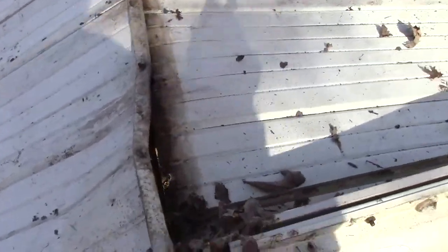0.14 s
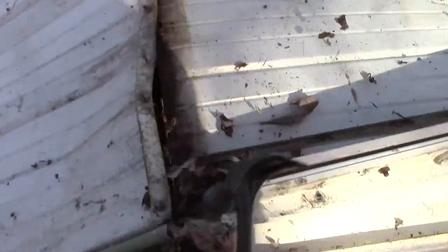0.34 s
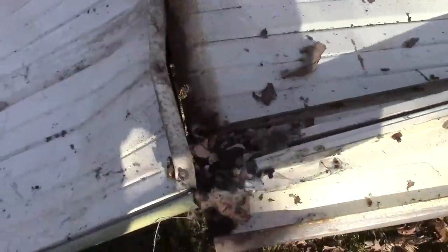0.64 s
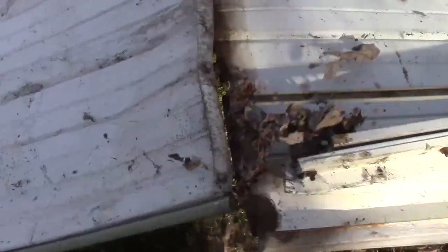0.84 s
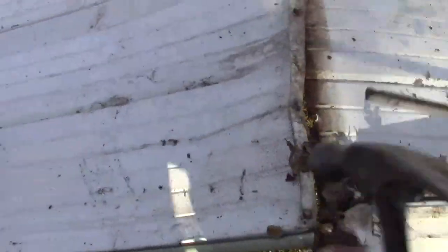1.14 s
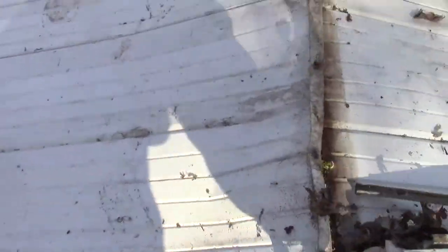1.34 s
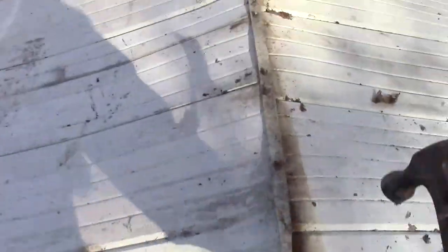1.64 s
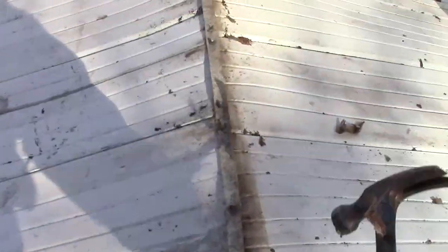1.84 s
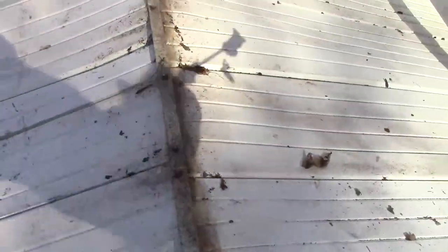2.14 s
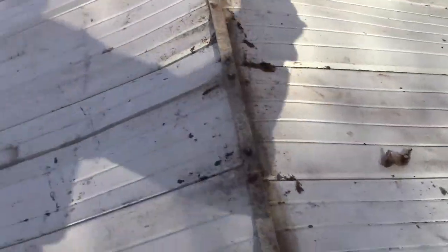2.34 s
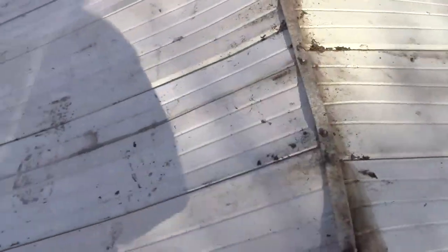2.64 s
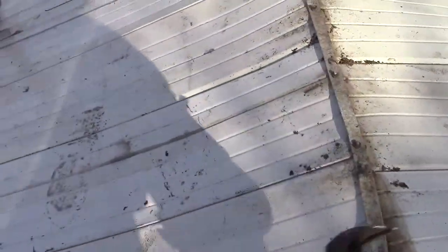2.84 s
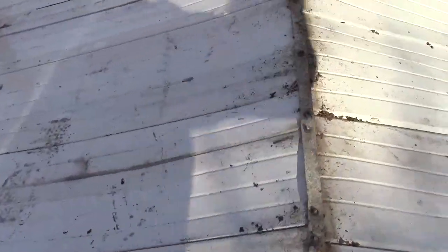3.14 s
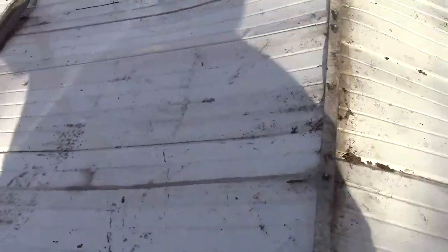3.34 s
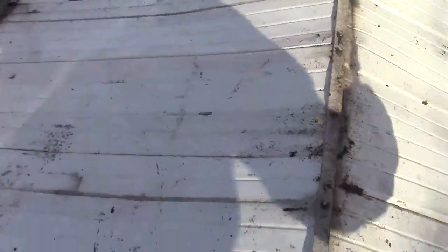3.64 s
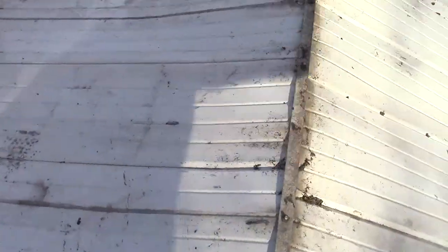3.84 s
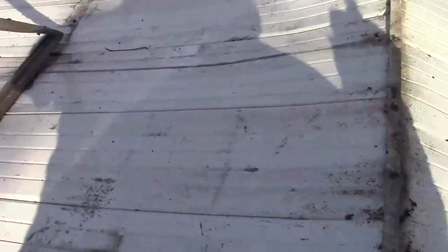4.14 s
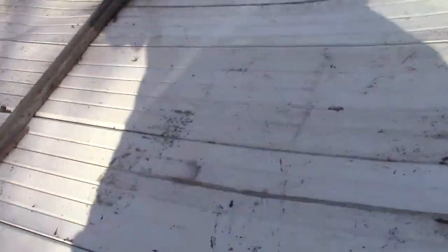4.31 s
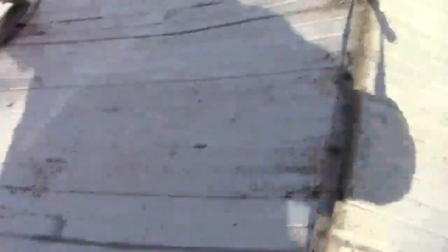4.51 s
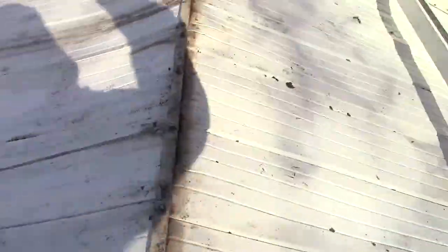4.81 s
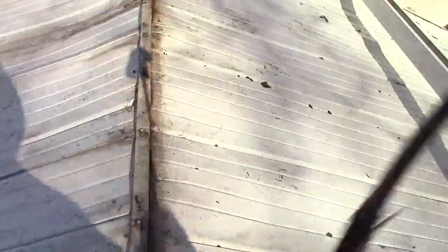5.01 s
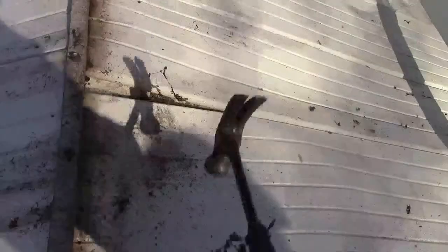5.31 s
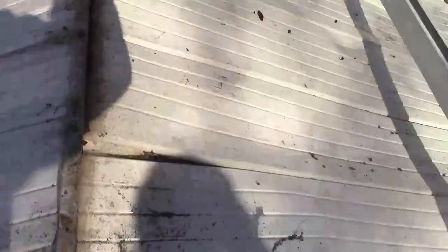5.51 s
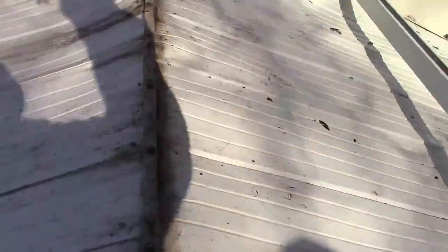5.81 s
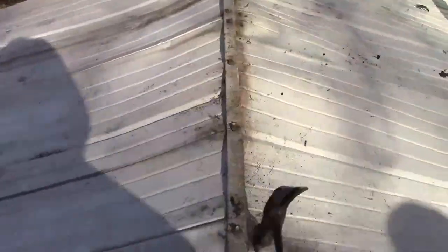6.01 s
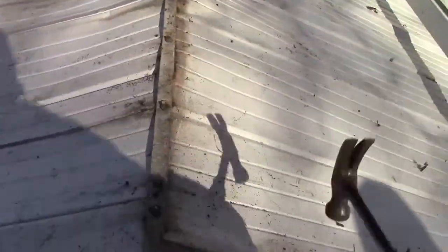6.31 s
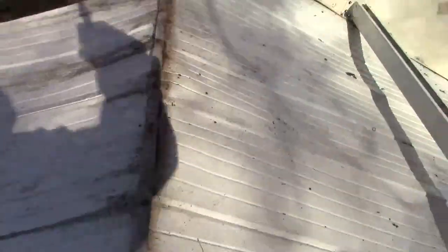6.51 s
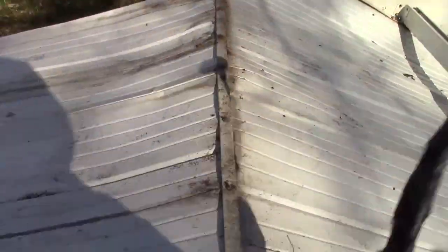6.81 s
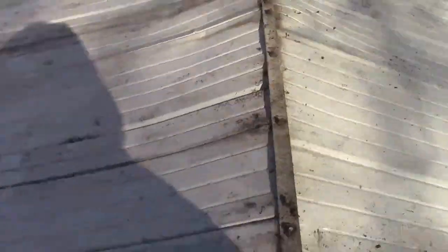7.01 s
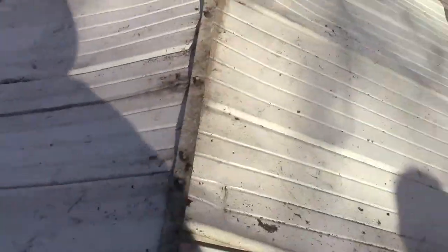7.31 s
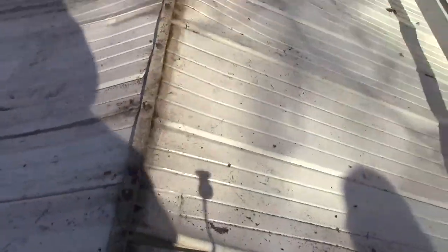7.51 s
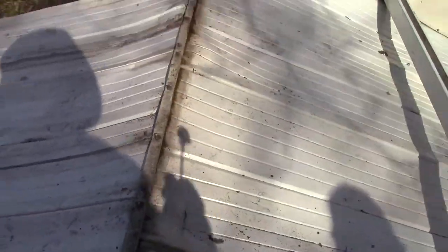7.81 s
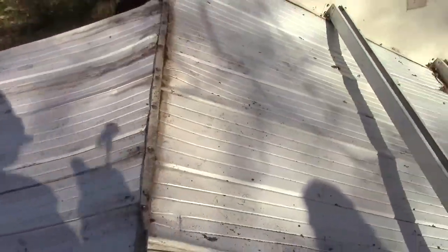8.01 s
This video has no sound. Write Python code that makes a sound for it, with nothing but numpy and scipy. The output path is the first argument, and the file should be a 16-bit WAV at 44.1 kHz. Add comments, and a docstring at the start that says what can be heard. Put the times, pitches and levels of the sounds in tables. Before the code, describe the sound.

A hammer strikes the thin ribbed steel wall of a collapsed shed eight times, a little under a second apart, close to the microphone outdoors. Each blow is a sharp, briefly ringing crash, and most are followed by a softer slap of the loose panel. The sheet grumbles and hums while grit and dry leaves skitter over it. Light taps end the sequence, and a distant bird whistles very faintly twice.

```python
"""A claw hammer strikes the seam of a collapsed shed's thin ribbed steel wall, on grass an arm's length away.
Each impact excites the sheet's densely spaced modes as a crash; the loose panel often slaps back, and
the seam sometimes buzzes. Stored vibration decays slowly, so the wall grumbles and hums while grit and
dry leaves skitter on it. The worker shifts about a few times, and a small bird whistles twice far off."""
import sys
import numpy as np
from scipy import signal
from scipy.fft import rfft, irfft, next_fast_len
from scipy.io import wavfile

SR = 44100
rng = np.random.default_rng(int(sys.argv[2]) if len(sys.argv) > 2 else 0)


def wav_record(signal):
    """Record a signal, one row per channel, as 16-bit PCM in the file named by sys.argv[1]."""
    frames = np.transpose(np.atleast_2d(signal))
    bounded = np.clip(frames, -1, 1)
    # unit amplitude maps onto the largest positive 16-bit level
    quanta = np.round(bounded * 32767).astype(np.int16)
    wavfile.write(sys.argv[1], SR, quanta)


N = 359415

# hammer blows: (time [s], relative level [dB], thump [dB], body [dB], treble [dB],
# ring time [ratio], boom [Hz], zing [Hz])
BLOWS = [(0.2772, -13, -5.5, -8, -2, 0.95, 770, 9050), (0.868, -14.5, -6, -11.5, 1, 0.77, 1190, 7100),
         (2.5262, -13.5, 3.5, -7.5, 1, 0.95, 450, 6200), (3.4138, -14.5, 4.5, 0.5, -2, 0.95, 340, 6000),
         (4.2816, -13, 6, -1.6, 0, 0.88, 650, 6520), (5.1216, -12, 3, -0.5, 0, 0.94, 510, 6780),
         (6.0406, -13.5, 5.5, 0.5, 1, 0.94, 530, 7780), (6.9228, -13, 4, 1.5, 1.5, 0.97, 540, 7180)]
# the loose panel slapping back: (the columns of BLOWS, edge clank level [dB])
SLAPS = [(0.5401, -28, -9.5, -10.5, -1, 1.12, 805, 3415, -11.5),
         (1.309, -32, -4.5, -8, -0.5, 1.48, 350, 6200, -36), (2.355, -41, 1, -4, -1.5, 1.4, 523, 4490, -36),
         (3.0709, -27.5, 2, -4.5, 0.5, 1.32, 433, 6000, -15.5),
         (3.8135, -23.5, 0, -4, 1.5, 1.14, 444, 5800, -24),
         (4.5648, -25, 1, -1.5, 1.2, 1.28, 547, 6500, -17),
         (5.3432, -26.5, 2.5, -4, 0.2, 0.85, 500, 6460, -18.5)]
# where a struck spot's thump, body, two level mids and treble lie: (frequency [Hz])
SPOT_TONE_HZ = [200, 500, 1100, 2500, 7000]
# excitation by a hard blow and by a soft slap: (frequency [Hz], spectral level [dB])
BLOW_SPECTRUM = [(18, -63), (30, -36), (65, -25), (135, -6), (259, 0.5), (540, -0.5), (822, -1.5),
                 (962, -0.5), (1250, -3.5), (1720, -1.5), (2410, -3), (2980, -2.5), (4530, -8),
                 (6050, -8.5), (8080, -8.5), (13700, -22.5), (16000, -47)]
SLAP_SPECTRUM = [(18, -71.5), (30, -42), (103, -23), (259, -0.5), (600, 0), (801, -3), (866, -2.5),
                 (1350, -9), (1910, -7.5), (2230, -10), (5900, -17.5), (14000, -36), (16000, -47)]
# mode clusters between the ribs: (frequency [Hz], width [Hz], boost [dB])
RIB_MODES = [(520, 70, 0.5), (612, 220, 4), (1120, 260, -2.5), (1193, 25, 0.5), (1486, 55, 3.5),
             (1670, 38, 3), (1820, 110, 1.5), (1980, 100, 3), (2280, 40, 1.5), (2856, 19, 4),
             (3400, 110, 2), (3974, 33, 1.5), (5950, 140, 4), (6860, 120, 4), (7440, 40, 2)]
# damping of the sheet: (frequency [Hz], base early T60 [s], base late T60 [s], late share [dB])
DAMPING = [(50, 0.14, 0.16, -17.5), (136, 0.055, 0.8, -21.5), (248, 0.073, 0.66, -9), (730, 0.4, 0.63, -4),
           (1980, 0.37, 0.59, -12.5), (3960, .27, 0.69, -19), (6700, 0.18, 0.62, -21),
           (14000, 0.12, 0.13, -5)]
# the panel's strong modes where it is hit: (mean frequency [Hz], relative level [dB], T60 [s])
CLONK_MODES = [(320, -7, .14), (386, 0, .21), (450, -1, .2), (535, -2, .15), (635, -3, .14),
               (1590, -4, .022), (1830, -2, .03)]
# seam buzz after hits near the loose end: (start [s], duration [s], level [dB])
RATTLES = [(0.324, 0.14, -37), (0.865, 0.11, -22.5), (2.538, 0.099, -27)]
# tool, twigs and grit knocking on the sheet: (time [s], relative level [dB], centre [Hz], T60 [s],
# skirt steepness [dB], hollow knock share [dB])
TAPS = [(1.2725, -34, 1860, 0.21, 3, -12), (1.6635, -45, 2180, 0.24, 2.5, -10),
        (1.94, -44, 8000, 0.06, 1, -20), (2.028, -43.5, 990, 0.22, 3.5, -8),
        (3.653, -44, 6000, .12, 7, -20), (3.679, -44, 6060, 0.14, 8, -20), (4.081, -45, 6700, 0.15, 6, -20),
        (5.682, -50, 6360, 0.1, 7, -20), (6.441, -45, 6820, 0.06, 3, -20),
        (7.193, -38.5, 4800, 0.16, 4, -6), (7.265, -45, 5400, 0.2, 6, -6), (7.315, -41, 448, 0.3, 4.5, -6),
        (7.525, -50, 2000, 0.14, 4, -12), (6.8655, -31, 4140, 0.06, 4.5, -17),
        (7.6445, -28.5, 1450, 0.055, 6, -17), (7.715, -56.5, 1800, 0.8, 45, -10),
        (7.806, -46, 2000, 0.07, 4, 0), (7.858, -47, 1880, 0.14, 50, -20)]
# larger bits landing: (time [s], level [dB])
PEBBLES = [(3.196, -46), (4.052, -51), (4.474, -43), (4.619, -32), (5.7454, -56.5), (6.3506, -46.5),
           (7.346, -44)]
# the flexing sheet: (frequency [Hz], spectral level [dB])
GRUMBLE_SPECTRUM = [(40, -33), (85, -26), (135, -7), (230, -0.5), (600, -4), (1200, -10.5), (1900, -10),
                    (3000, -17), (6000, -41.5), (16000, -50.5)]
# lightly damped modes: (frequency [Hz], relative level [dB], nominal width [Hz])
HUM_MODES = [(690, -5, 14), (824, -2, 7), (1710, -8, 50), (1846, -6, 18)]
# sliding cloth and leaves: (frequency [Hz], spectral level [dB])
RUSTLE_SPECTRUM = [(200, -23.5), (1000, -1.5), (2000, 2.5), (4000, 3), (7000, 0), (10000, -3.5),
                   (15000, -13)]
# the worker's movements: (start [s], duration [s], grumble level [dB], rustle level [dB])
WORKER_SHIFTS = [(0.761, 0.16, -67, -61.5), (1.376, 0.54, -83, -63.5), (1.76, 0.49, -61, -60.5),
                 (2.119, 0.49, -65.5, -80.5), (6.64, 0.19, -60, -67), (7.643, 0.4, -71, -74)]
# the bird's notes: (start [s], duration [s], pitch [Hz], level [dB])
BIRD_NOTES = [(2.05, 0.19, 4550, -61.5), (2.15, 0.038, 7600, -61), (6.71, 0.17, 4640, -69),
              (6.746, 0.08, 7620, -73)]
# stereo width: (frequency [Hz], side relative to mid [dB])
SIDE_SPECTRUM = [(100, -40), (250, -46), (500, -46), (1000, -20), (2000, -21), (4000, -11.5),
                 (8000, -11), (14000, -13.5)]

BAND_EDGES_HZ = np.append([0, 85], 160 * 2 ** np.arange(0, 7.5, .5))
RING_S, EARLY_S = 1.0, .08  # a whole hit, and its opening
BOOM_DB, ZING_DB, SPOT_WIDTH = 3.5, 2, .12  # a struck spot's two peaks; width as a share of pitch
SHAKE_SPREAD_S, SHAKE_T60_S, DEBRIS_T60_S = .096, 1.44, .9
SLAP_SHAKE_DB = 7.5  # a falling panel shakes the wall more than the hammer does
GRIT_PER_S, GRIT_RANGE_DB = 110, 15


def impacts(table, spectrum, gain_db, clonk_db, rise_s, chatter_db, crack_db):
    """Impact excitation: the point where hammer or panel strikes sets the weight of the sheet's modes."""
    out = np.zeros(N)
    for s, db, thump_db, body_db, treble_db, ring, boom_hz, zing_hz, *_ in table:
        spot = list(zip(SPOT_TONE_HZ, [thump_db, body_db, 0, 0, treble_db]))
        boom = (boom_hz, SPOT_WIDTH * boom_hz, BOOM_DB)
        zing = (zing_hz, SPOT_WIDTH * zing_hz, ZING_DB)
        peaks = [*RIB_MODES, boom, zing]
        add(out, s, undb(db + gain_db) * crash(spectrum, spot, peaks, ring, rise_s, chatter_db, crack_db))
        add(out, s + .0012, undb(db + clonk_db) * clonk(spot))  # the panel bottoms out
    return out


def crash(spectrum, spot, peaks, ring, rise_s, chatter_db, crack_db):
    """Modal overlap: crowded modes merge into noise, each band decaying fast and then lingering."""
    size = int(RING_S * SR)
    t, hz = np.arange(size) / SR, bins(size)
    peaks_db = sum(db / (1 + (2 * (hz - f) / width) ** 2) for f, width, db in peaks)
    gain = undb(along(hz, spectrum) + along(hz, spot) + peaks_db)
    modes = gain * rfft(rng.standard_normal(size))
    # chattering edges and grit roughen the treble of the tail
    chatter = undb(chatter_db * (walk(600, size) + .8 * walk(45, size)))
    chatter /= rms(chatter)
    out = np.zeros(size)
    for lo, hi in zip(BAND_EDGES_HZ, BAND_EDGES_HZ[1:]):
        band, centre = (hz >= lo) & (hz < hi), (lo + hi) / 2
        early_t60, late_t60, late_db = (along(centre, DAMPING, column) for column in (1, 2, 3))
        # the contact itself, brightest at the top
        crack = undb(crack_db) * (1 + (centre / 7000) ** 2) * fade(t, t60=.012)
        early = fade(t, ring * early_t60) + crack
        late = undb(late_db) * fade(t, ring * late_t60) * (chatter if centre > 2500 else 1)
        # dispersion: bending waves are slower in the bass, so the lows swell later
        swell = 1 - np.exp(-t / (rise_s + .09 / centre))
        part = irfft(modes * band, size) * swell * np.hypot(early, late)
        out += part / rms(part) * rms(gain * band)
    return out / rms(out[:int(EARLY_S * SR)])


def clonk(spot):
    """Free vibration: a few strong modes ring as damped sines, varying in pitch and level by hit."""
    t = np.arange(int(RING_S * SR)) / SR
    out = np.zeros(len(t))
    for hz, db, t60 in CLONK_MODES:
        share, detune = rng.standard_normal(2)
        gain = undb(db + along(hz, spot) + .6 * share)
        out += gain * np.sin(2 * np.pi * hz * (1 + .065 * detune) * t) * fade(t, t60)
    return out * (1 - np.exp(-t / .0019))


def edge_clanks(pitch_hz, t60):
    """Heavily damped oscillation: the falling panel's edge meets the seam and rings very briefly."""
    out, t = np.zeros(N), np.arange(int(EARLY_S * SR)) / SR
    ping = np.sin(2 * np.pi * pitch_hz * t) * fade(t, t60) * (1 - np.exp(-t / .0005))
    for s, *_, clank_db in SLAPS:
        add(out, s + .001, undb(clank_db) * ping / ping.max())
    return out


def seam_rattles(centre_hz, skirt_db, rough_db):
    """Intermittent contact: overlapping edges buzz against each other in rough, bright bursts."""
    envelope = np.zeros(N)
    buzz = noise(hump(bins(N), centre_hz, skirt_db), N) * undb(rough_db * walk(400, N))
    for s, length, db in RATTLES:
        add(envelope, s, undb(db) * arch(length))
    return envelope * buzz / rms(buzz)


def taps(gain_db, rise_s, knock_hz, knock_t60):
    """Selective excitation: a light tap wakes one band of modes, over the panel's hollow knock."""
    out, size = np.zeros(N), SR // 2
    t, hz = np.arange(size) / SR, bins(size)
    for s, db, centre, t60, skirt_db, knock_db in TAPS:
        tap = noise(hump(hz, centre, skirt_db), size) * fade(t, t60)
        knock = undb(knock_db) * noise(hump(hz, knock_hz, skirt_db=6.5), size) * fade(t, knock_t60)
        add(out, s, undb(db + gain_db) * (tap + knock) * (1 - np.exp(-t / rise_s)))
    return out


def pebbles(centre_hz, skirt_db):
    """Isolated impulses: larger bits of grit and twig land one by one."""
    out = np.zeros(N)
    for s, db in PEBBLES:
        add(out, s, undb(db) * tick(centre_hz, skirt_db))
    return out


def tick(centre_hz, skirt_db):
    """Brief contact has a broad spectrum: a crumb on steel gives a snap and a faint ring."""
    size = int(EARLY_S * SR)
    t = np.arange(size) / SR
    snap, ring = fade(t, t60=.012), undb(-6) * fade(t, t60=.04)
    return noise(hump(bins(size), centre_hz, skirt_db), size) * (snap + ring)


def settling():
    """Incoherent sources add in power: the wall's shaking and the worker drive the quiet sounds."""
    shake, bounce = shaking(SHAKE_T60_S), shaking(DEBRIS_T60_S)
    weight, drag = worker(rest_grumble_db=-69, rest_rustle_db=-71.5)
    initial_sway = undb(-28.5) * fade(np.arange(N) / SR, SHAKE_T60_S)
    sway = np.hypot(shake, initial_sway)
    wall = grumble(np.hypot(undb(-25) * sway, weight), flex_db=.5) + hum(undb(-34) * sway)
    leaves = rustle(np.hypot(undb(-22.5) * bounce, drag), crackle_db=2)
    return wall + leaves + grit(undb(-33) * bounce, centre_hz=6100, skirt_db=11, cluster_db=2.5)


def shaking(t60):
    """Energy storage: each hit adds energy that spreads and dissipates; amplitude is its square root."""
    t = np.arange(N) / SR
    response = fade(t, t60) * (1 - np.exp(-t / SHAKE_SPREAD_S))
    energy = np.zeros(N)
    for table, gain_db in ((BLOWS, 0), (SLAPS, SLAP_SHAKE_DB)):
        for s, db, _, body_db, *_ in table:
            add(energy, s, (undb(db + gain_db + body_db / 2) * response) ** 2)
    return np.sqrt(energy)


def grumble(drive, flex_db):
    """Flexural vibration: the sheet bends unevenly and sounds its low modes."""
    return noise(along(bins(N), GRUMBLE_SPECTRUM), N) * drive * undb(flex_db * walk(22, N))


def hum(drive):
    """Resonance: narrow, lightly damped modes sound as long as the wall shakes."""
    power = sum(undb(db) ** 2 / width / (1 + (2 * (bins(N) - hz) / width) ** 2) ** 2
                for hz, db, width in HUM_MODES)
    return noise(10 * np.log10(power), N) * drive


def rustle(drive, crackle_db):
    """Friction: cloth and leaves drag over the sheet in tiny catches."""
    catches = undb(crackle_db * walk(220, N) + 1.5 * walk(35, N))
    return noise(along(bins(N), RUSTLE_SPECTRUM), N) * drive * catches / rms(catches)


def grit(drive, centre_hz, skirt_db, cluster_db):
    """Shot noise: crumbs thrown up by the shaking land at random, their ticks swelling in clusters."""
    out = np.zeros(N)
    ticks = [tick(centre_hz * 2 ** rng.uniform(-.5, .46), skirt_db) for _ in range(20)]
    for k, (when, strength) in enumerate(rng.random((int(GRIT_PER_S * N / SR), 2))):
        add(out, when * N / SR, undb(GRIT_RANGE_DB * strength ** 2) * ticks[k % len(ticks)])
    out *= undb(cluster_db * walk(20, N))
    return out / rms(out) * drive


def worker(rest_grumble_db, rest_rustle_db):
    """Slow forcing: each movement swells and eases the weight on the sheet and the drag over it."""
    weight, drag = np.full(N, undb(rest_grumble_db)), np.full(N, undb(rest_rustle_db))
    for s, length, grumble_db, rustle_db in WORKER_SHIFTS:
        add(weight, s, undb(grumble_db) * arch(length))
        add(drag, s, undb(rustle_db) * arch(length))
    return weight, drag


def bird(waver):
    """Frequency and amplitude modulation: thin whistles buzz slightly and flutter as they trail away."""
    out = np.zeros(N)
    for s, length, hz, db in BIRD_NOTES:
        size = int(length * SR)
        phase = 2 * np.pi * np.cumsum(hz * (1 + waver * walk(387, size))) / SR
        flutter = undb(3.5 * walk(70, size))
        swell = np.sin(np.pi * np.sqrt(np.arange(size) / size))
        add(out, s, undb(db) * flutter * swell * np.sqrt(2) * np.sin(phase))
    return out


def microphone_pair(mid, right_db):
    """Spatial coherence: two close ports agree in the bass, but the wide sheet's treble differs at each."""
    size = next_fast_len(N)
    hz = bins(size)
    # waves cross the sheet in all directions, so the phase between the ports wanders
    diffuse = np.real(signal.hilbert(mid, size) * np.exp(1j * np.pi * walk(80, size)))
    lean = (undb(right_db / 2) - 1) * hz ** 2 / (hz ** 2 + 2500 ** 2)  # treble leans right
    side = irfft(rfft(diffuse) * undb(along(hz, SIDE_SPECTRUM)) - rfft(mid, size) * lean, size)[:N]
    return np.array([mid + side, mid - side])


def undb(db):
    """Decibels to amplitude ratio."""
    return 10 ** (np.asarray(db) / 20)


def rms(x):
    """Root mean square."""
    return np.sqrt(np.mean(x ** 2)) + 1e-18


def along(hz, points, column=1):
    """Interpolation of a table column on a log-frequency axis."""
    points = np.array(points, float)
    return np.interp(np.log(np.maximum(hz, 1)), np.log(points[:, 0]), points[:, column])


def bins(size):
    """Fourier frequencies of size samples."""
    return np.arange(size // 2 + 1) * SR / size


def hump(hz, centre_hz, skirt_db):
    """Band-pass response in dB of one broad group of modes."""
    hz = np.maximum(hz, 1)
    return -skirt_db * np.log2(1 + (hz / centre_hz - centre_hz / hz) ** 2)


def noise(db, size):
    """Gaussian noise of unit rms with spectral shape db."""
    x = irfft(rfft(rng.standard_normal(size)) * undb(db), size)
    return x / rms(x)


def walk(rate, size):
    """Random modulation with spread near 1, through rate points a second."""
    position, count = np.arange(size) * rate / SR, 8192
    return 1.2 * np.interp(position, np.arange(count), rng.standard_normal(count))


def fade(t, t60):
    """Exponential decay by 60 dB in t60 seconds."""
    return np.exp(-np.log(1000) * t / t60)


def arch(length_s):
    """Half-sine envelope."""
    return np.sin(np.linspace(0, np.pi, int(length_s * SR)))


def add(track, s, x):
    """Superpose x on the track at time s."""
    i = int(s * SR)
    track[i:i + len(x)] += x[:N - i]


def scene():
    """Superposition: blows, slaps and small sounds on the one sheet, with the bird behind."""
    blows = impacts(BLOWS, BLOW_SPECTRUM, gain_db=-1, clonk_db=-10, rise_s=.0005,
                    chatter_db=1.5, crack_db=-10.5)
    slaps = impacts(SLAPS, SLAP_SPECTRUM, gain_db=-2.5, clonk_db=4.5, rise_s=.0018,
                    chatter_db=0, crack_db=-7.5)
    small = taps(gain_db=-2.5, rise_s=.00082, knock_hz=340, knock_t60=.11)
    small += pebbles(centre_hz=5740, skirt_db=9) + settling()
    seam = seam_rattles(centre_hz=2800, skirt_db=6, rough_db=2) + edge_clanks(pitch_hz=1776, t60=.01)
    return microphone_pair(blows + slaps + seam + small + bird(waver=.012), right_db=1.1)


def record(dry):
    """Saturation and band limiting: peaks round off, the small microphone thins the bass, the top is cut."""
    ceiling, knee, bass_hz, top_hz = .88, 4, 74, 15600
    rounded = dry / (1 + np.abs(dry / ceiling) ** knee) ** (1 / knee)
    thin = signal.sosfilt(signal.butter(2, bass_hz, "highpass", fs=SR, output="sos"), rounded)
    return signal.sosfilt(signal.ellip(8, .2, 70, top_hz, fs=SR, output="sos"), thin)


dry = scene()
out = record(dry)
wav_record(out)
```